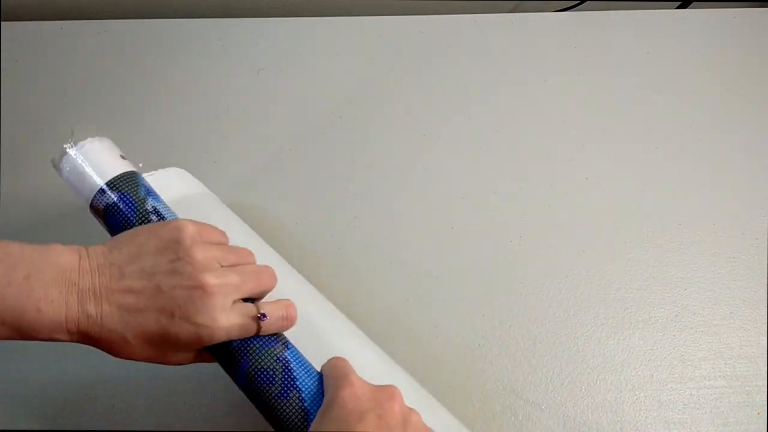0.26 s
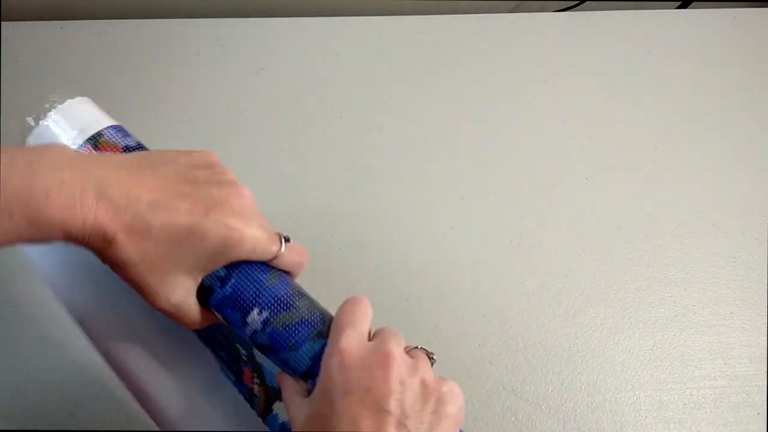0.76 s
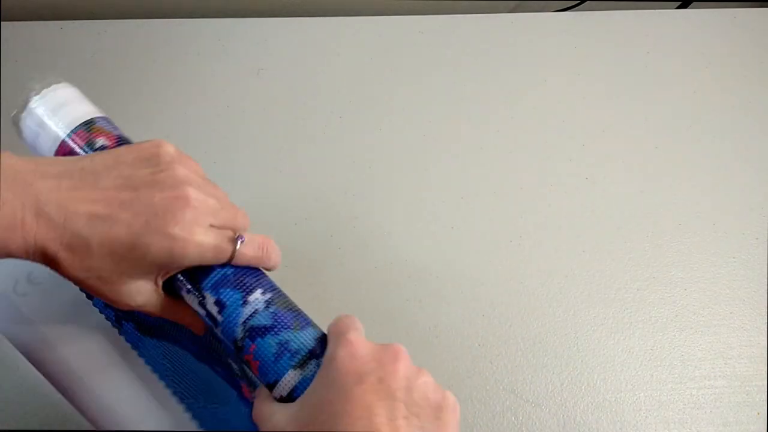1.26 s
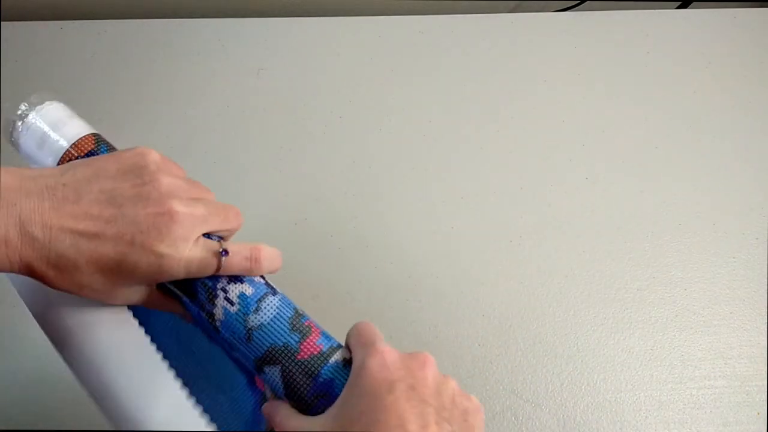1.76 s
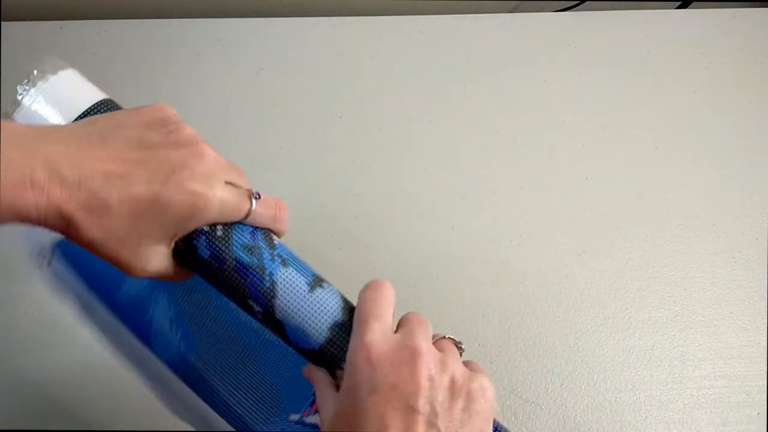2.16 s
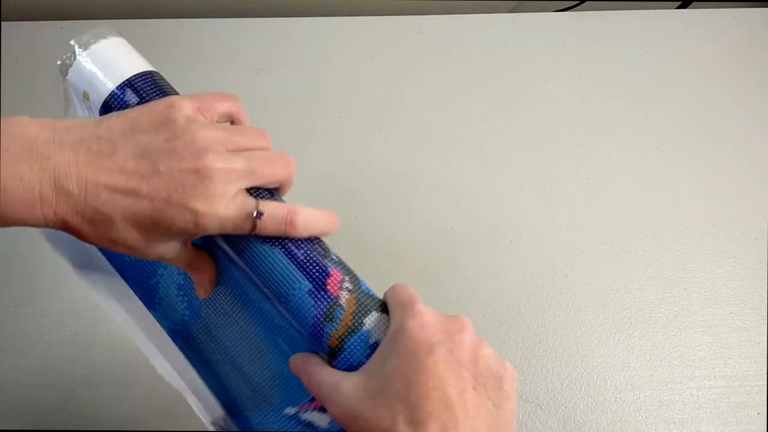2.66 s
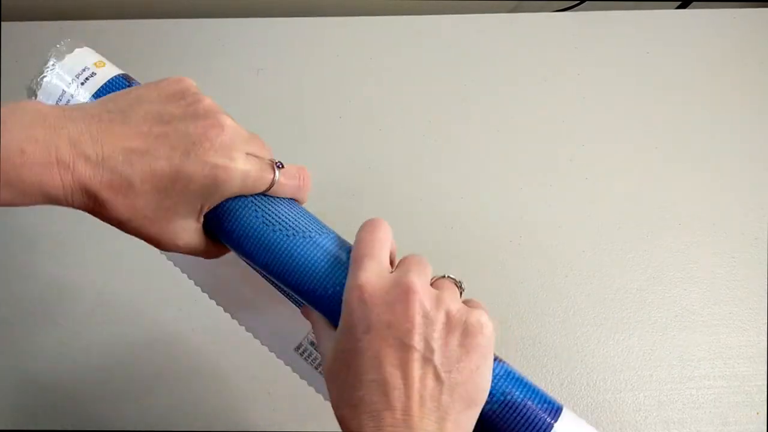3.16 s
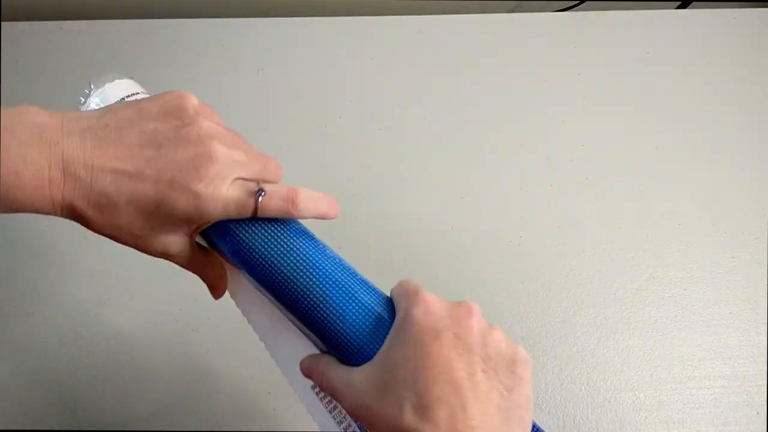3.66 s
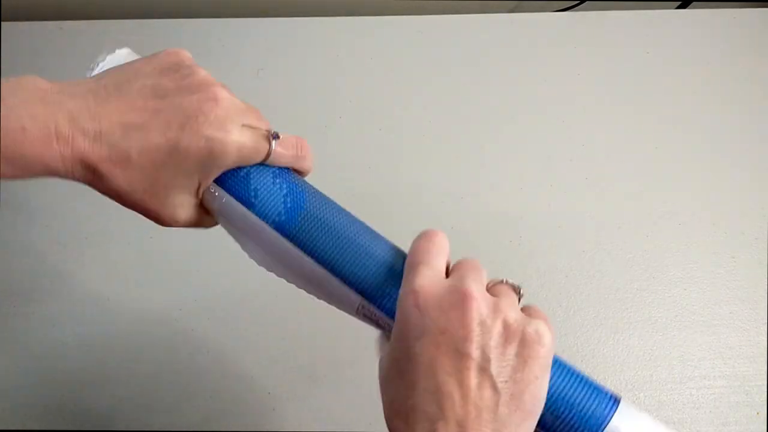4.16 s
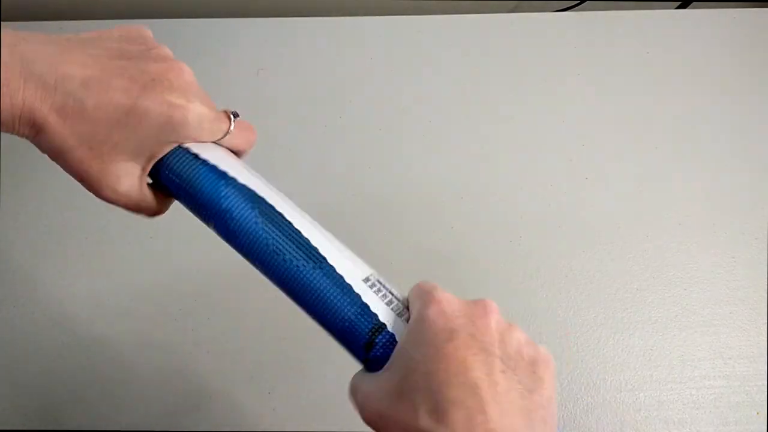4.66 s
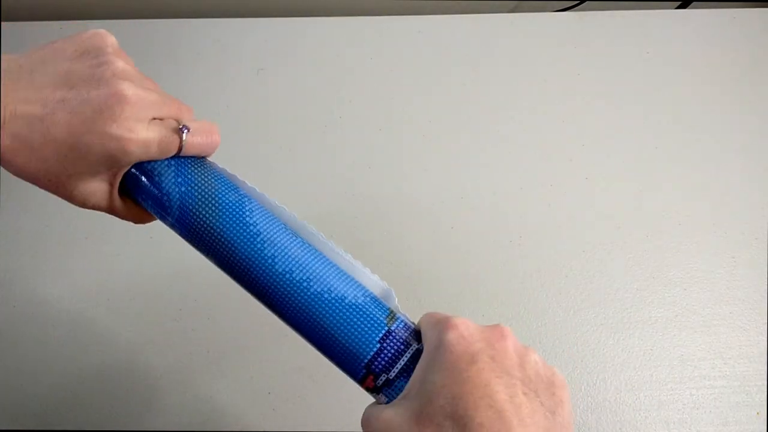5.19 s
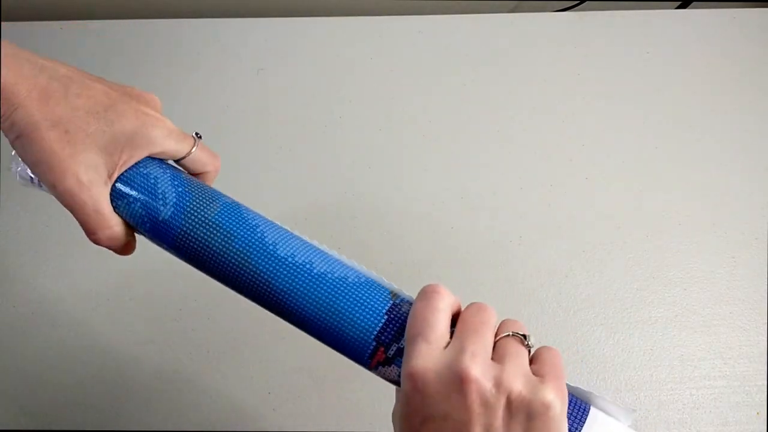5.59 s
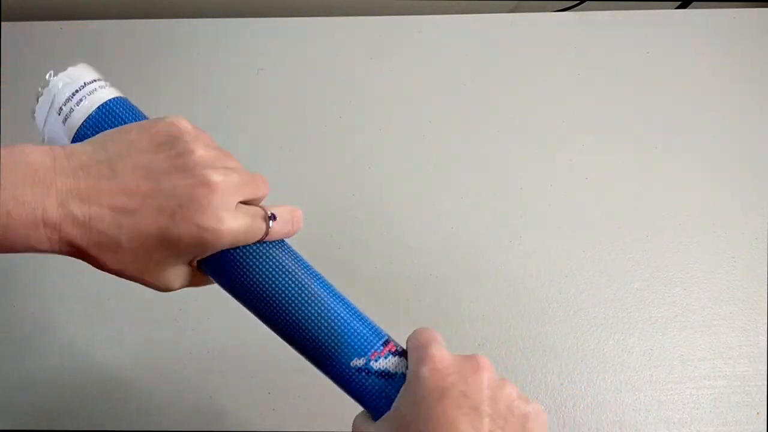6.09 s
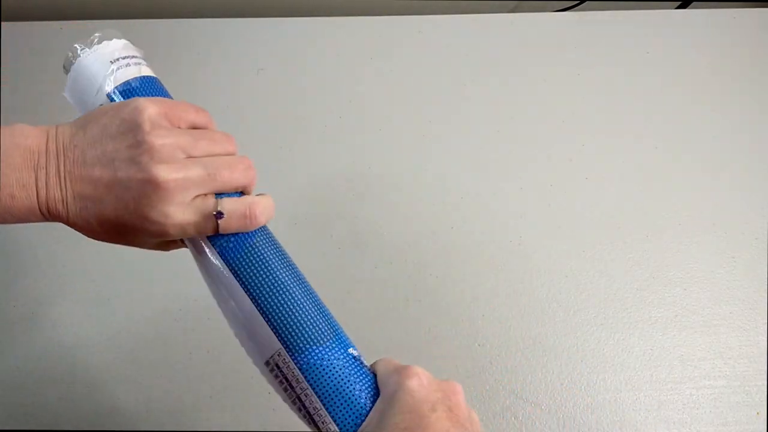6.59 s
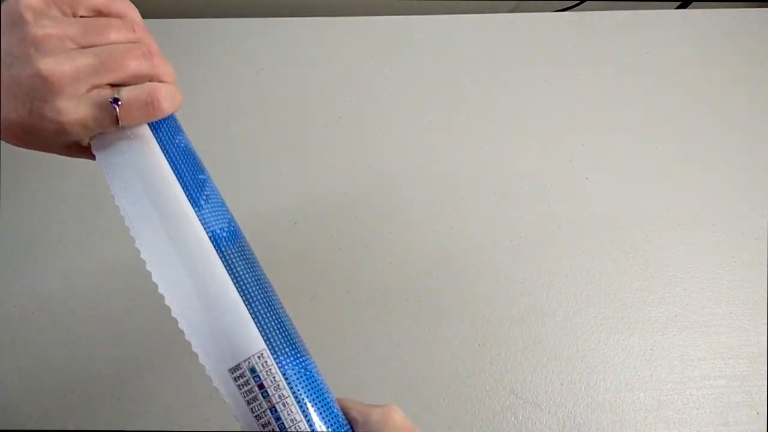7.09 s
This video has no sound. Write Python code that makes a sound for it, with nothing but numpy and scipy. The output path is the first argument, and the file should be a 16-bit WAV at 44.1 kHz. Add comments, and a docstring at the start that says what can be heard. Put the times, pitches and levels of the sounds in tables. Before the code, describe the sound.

A close small microphone picks up a stiff roll being turned and tightened by hand. Coarse cloth rubbing and hollow pops mix with plastic crackle at first; a burst of hard bright snaps follows in the middle, then thinner film rustling with pauses and a few last sharp clicks. Soft low bumps of the table, short small-room reflections and quiet low room tone lie beneath.

```python
"""Bright crinkling, sharp snaps and dull pops, push by push: hands roll stiff film-covered canvas into a tube.
Film is dense random grains, clicks and ringing ticks; cloth is duller grains, part of them ringing in the tube.
Snaps are banded noise bursts; pops are kicked panel modes that also excite the air column of the roll.
Below lie thuds and rumble of the table, small-room reflections and a steady low room tone.
A close small microphone adds two treble resonances and cuts the top."""
import sys
import numpy as np
from scipy import signal
from scipy.fft import rfft, irfft
from scipy.io import wavfile
from scipy.ndimage import uniform_filter1d

SR = 44100
rng = np.random.default_rng(int(sys.argv[2]) if len(sys.argv) > 2 else 0)


def unload_wav(signal):
    """Save mono or channel-first audio to the path in sys.argv[1] as 16-bit WAV at rate SR, clipped to [-1, 1]."""
    wavfile.write(
        sys.argv[1],
        SR,
        np.round(np.clip(np.atleast_2d(signal).T, -1, 1) * 32767).astype(np.int16),
    )


N = 323694
MIC_LIFT_DB = 7.5  # added to the treble by the mic; taken off at the source


def from_db(db):
    """dB to amplitude gain."""
    return 10 ** (np.asarray(db) / 20)


def rms_one(x):
    """Scale to rms 1."""
    return x / np.sqrt(np.mean(x ** 2) + 1e-20)


def drift(rate_hz):
    """Slow random curve, rms 1: noise twice through a one-pole low-pass."""
    r = np.exp(-2 * np.pi * rate_hz / SR)
    noise = rng.standard_normal(N + SR)
    return rms_one(signal.lfilter([1], [1, -2 * r, r * r], noise)[SR:])


def colour(x, spectrum, size=4096):
    """Minimum-phase filter with the given spectrum, via the folded cepstrum."""
    hz, level_db = np.transpose(spectrum)
    bins_hz = np.fft.rfftfreq(size, 1 / SR)
    gain_db = np.interp(np.log(bins_hz + 1), np.log(hz), level_db)
    cepstrum = irfft(np.log(from_db(gain_db)))
    cepstrum[1:size // 2] *= 2
    cepstrum[size // 2 + 1:] = 0
    impulse = irfft(np.exp(rfft(cepstrum)))
    return signal.fftconvolve(x, impulse)[:N]


def ring(clicks, hz, t60_s):
    """Two-pole resonator: a unit click starts a decaying sine of height 1; t60 at least 3 ms."""
    r = from_db(-60 / (max(t60_s, 0.003) * SR))
    w = 2 * np.pi * hz / SR
    return signal.lfilter([0, np.sin(w)], [1, -2 * r * np.cos(w), r * r], clicks + 1e-18)


def grains(per_s, spread_db):
    """Tiny creases flip at random, either sign, a few much larger than the rest; rms 1."""
    sizes = from_db(spread_db * np.minimum(rng.exponential(1, N), 5)) * rng.choice([-1, 1], N)
    born = rng.random(N) < per_s / SR
    return rms_one(sizes * born)


# Finger pushes on the roll: [full force t/s, held/s, film level/dB, cloth level/dB re film]
PUSHES = [(0, 0, -39, 2.5), (0.109, 0.069, -42, 2), (0.282, 0.037, -44, 4), (0.349, 0.039, -47.5, 8),
          (0.471, 0.11, -47, 6.5), (0.652, 0.031, -47.5, 5.5), (0.74, 0.025, -47.5, 0.5),
          (0.819, 0.076, -46.5, 3.5), (0.94, 0.026, -45.5, 2.5), (1.042, 0.095, -41, -1),
          (1.24, 0.094, -53, 0.5), (1.35, 0.21, -60.5, 5), (1.542, 0.044, -49, 4.5),
          (1.64, 0.048, -47, -4.5), (1.77, 0.0048, -47.5, -6), (1.84, 0.08, -49, -5.5),
          (1.921, 0.018, -46.5, 3.5), (2.02, 0.092, -48, -3), (2.19, 0.03, -46.5, -0.5),
          (2.26, 0.0095, -51.5, 9), (2.36, 0.15, -48.5, -2), (2.49, 0.072, -44, -2.5),
          (2.59, 0.048, -37, -10.5), (2.692, 0, -38.5, 0.5), (2.782, 0.099, -37.5, -4.5),
          (3.05, 0.018, -50, -3), (3.162, 0.022, -39, -6.5), (3.24, 0.038, -47, -4.5),
          (3.4, 0.032, -43.5, -6), (3.51, 0.0092, -42.5, -14), (3.58, 0.076, -55, 1.5),
          (3.769, 0.085, -50, -6), (3.91, 0.036, -51, -1.5), (3.97, 0.046, -51, -11),
          (4.12, 0.012, -37, -15.5), (4.289, 0.018, -44, -5.5), (4.451, 0.024, -45, -12),
          (4.612, 0.033, -43, -8.5), (4.792, 0.063, -44, -10), (4.93, 0.078, -45.5, -10),
          (5.06, 0.019, -49, -14.5), (5.222, 0.04, -43, -6.5), (5.32, 0.029, -48, -11),
          (5.518, 0.046, -44, -10), (5.65, 0.088, -54.5, -11), (5.8, 0.08, -49, -8),
          (5.92, 0.0067, -48.5, -9), (6.05, 0.0, -50, -26), (6.08, 0.034, -50, -9.5),
          (6.21, 0.049, -55.5, -5.5), (6.32, 0.046, -55, -5.5), (6.39, 0.036, -66.5, 1.5),
          (6.59, 0.1, -49, -13), (6.8, 0.073, -52.5, -15), (6.98, 0, -42, -16), (7.198, 0.039, -46.5, -20)]


def pushes():
    """Film and cloth gains: pushes swell fast, hold, fade more slowly; overlapping powers add."""
    swell_db_per_s, fade_db_per_s = 409, 192
    t = np.arange(0, N + 64, 64) / SR
    power = 0
    for s, held_s, film_db, cloth_db in PUSHES:
        swell_db = -swell_db_per_s * np.maximum(s - t, 0)
        fade_db = -fade_db_per_s * np.maximum(t - s - held_s, 0)
        level_db = film_db + np.array([[0], [cloth_db]]) + swell_db + fade_db
        power = power + from_db(level_db) ** 2
    return [np.interp(np.arange(N) / SR, t, np.sqrt(p)) for p in power]


def slips(per_s, spread_db, t60_s):
    """Stick-slip loudness: uneven slips die away over steady creep; local rms held near 1."""
    sizes = from_db(spread_db * np.minimum(rng.exponential(1, N), 4))
    born = rng.random(N) < per_s / SR
    decay = from_db(-60 / (t60_s * SR))
    fading = 0.5 + rms_one(signal.lfilter([1], [1, -decay], sizes * born))
    return fading / np.sqrt(uniform_filter1d(fading ** 2, size=4000))


def ticks(per_s, spread_db, cycles, count=20):
    """Small facets pop, each ringing briefly at one of 20 pitches, dealt at random."""
    flips = grains(per_s, spread_db)
    dealt = rng.integers(0, count, N)
    out = 0
    for k, hz in enumerate(np.geomspace(900, 15000, count)):
        out = out + ring(flips * (dealt == k), hz, cycles / hz) * np.sqrt(hz)
    return out


# Film spectrum at the source: [f/Hz, level/dB per Hz]
FILM_SPECTRUM = [(300, -54), (1000, -17.5), (2000, 2.5), (3000, -1.5), (4500, -3.5), (7000, -5),
                 (11000, -9.5), (16500, -8)]


def film(gain, slip):
    """Plastic crinkle: slip-driven dense grains, coloured ticks and lone sharp clicks."""
    dense = rms_one(slip * grains(12000, 1.1))
    coloured = rms_one(ticks(460, 0.82, 19.0))
    lone = rms_one(np.diff(grains(300, 4.0), prepend=0))
    bed = dense + 0.25 * coloured + 0.55 * lone
    return gain * from_db(-MIC_LIFT_DB) * rms_one(colour(bed, FILM_SPECTRUM))


# Air-column modes of the roll: [f/Hz, level/dB, t60/s]
TUBE_MODES = [(344.4, -6, 0.2), (424, 0.5, 0.055), (687, -26, 0.011), (812.4, 1, 0.066), (1294, 1, 0.023),
              (1390, -6, 0.12), (1636, -11, 0.051), (2000, 4.5, 0.029)]


def tube(x):
    """Air column of the roll: parallel modes of alternating sign."""
    out = 0
    for k, (hz, db, t60_s) in enumerate(TUBE_MODES):
        out = out + (-1) ** k * from_db(db) * ring(x, hz, t60_s)
    return out


# Cloth spectrum at the source: [f/Hz, level/dB per Hz]
CLOTH_SPECTRUM = [(100, -18.5), (270, -9.5), (340, -8.5), (700, 3.5), (1000, 2), (2000, 2.5), (2900, -0.5),
                  (4000, -10), (8000, -21.5)]


def cloth(gain, slip):
    """Fibres and coating rub and crease; part of it rings in the tube."""
    rub = slip ** 0.38 * grains(4000, 2.65) * from_db(2.76 * drift(27.0))
    direct = rms_one(colour(rub, CLOTH_SPECTRUM))
    return gain * rms_one(direct + 0.28 * rms_one(tube(rub)))


# Film creases snapping over: [t/s, nominal peak level/dB, low-band level/dB re peak]
SNAPS = [(0.0575, -31, 5), (0.1626, -20.5, -13), (0.388, -26, -18), (0.4687, -23.5, 7.5), (0.73, -25, 8),
         (0.736, -19.5, -36), (0.8196, -20, -6), (0.8705, -23.5, 7), (0.9183, -31, -15), (0.9533, -23, -34),
         (0.996, -21, -19), (1.0429, -40, 19), (1.1095, -33.5, 12.5), (1.2514, -24, -16),
         (1.3653, -25.5, -27), (1.5407, -24, 0.5), (1.7762, -30, 7.5), (1.843, -29, -19),
         (1.8774, -22.5, -6), (1.931, -24, -26), (2.012, -19, -39), (2.0418, -19, -35), (2.127, -31, -12),
         (2.176, -17, -16), (2.211, -22.5, -10), (2.353, -27, -28), (2.378, -23, -8), (2.3986, -29, -6),
         (2.4566, -28, -12), (2.4842, -26, 0), (2.51, -18, -25), (2.543, -19, -7), (2.575, -21, -2),
         (2.606, -21, 2), (2.6753, -29, -15), (2.6943, -13, -27), (2.7008, -15, -7), (2.7764, -22.5, -14),
         (2.7916, -20, -30), (2.818, -37, -27), (2.8602, -15.5, -20), (2.895, -18, -4), (2.9625, -25, -21),
         (3.06, -25.5, 3), (3.1414, -20.5, -34), (3.1758, -21.5, -34), (3.24, -29.5, 5), (3.253, -26, 2),
         (3.2938, -28.5, 3), (3.317, -27, -16), (3.391, -22.5, -38), (3.431, -21.5, -35),
         (3.5042, -22, -46), (3.5884, -26, -18), (3.7485, -34.5, 2), (3.793, -27.5, -0.5),
         (4.0984, -37, -27), (4.124, -16.5, -34), (4.1804, -18, -2), (4.4434, -30, -13), (4.586, -43, 0),
         (4.6314, -33, -20), (4.781, -30, -24), (4.9135, -25, -9), (5.065, -24.5, -9), (5.1808, -29.5, -13),
         (5.2195, -38, -11), (5.243, -23.5, -14), (5.3233, -33.5, 3), (5.405, -34, -28), (5.5024, -41, -23),
         (5.8383, -32, -3), (5.9244, -37, -18), (5.9688, -25, -44), (6.0294, -25.5, -5.5),
         (6.0621, -29, -26), (6.19, -37, -12), (6.4086, -31.5, 0.5), (6.574, -32, -3.5), (6.5915, -37, -29),
         (6.64, -18, -46), (6.9872, -20, -42), (7.1675, -31.5, -11), (7.196, -30, -29), (7.2025, -19, -20),
         (7.221, -26, -30), (7.228, -26, -28)]


def snaps(size=4410):
    """A crease snaps over: sharp crack, then dying micro-cracks, in three noise bands."""
    t60_s, rise_s, crack_tau_s = 0.068, 0.00078, 0.00023
    top_db, crest_db = -1, 12  # top band re peak; burst peak over its rms
    t = np.arange(size) / SR
    shape = from_db(-60 * t / t60_s) * np.minimum(t / rise_s, 1) + 2.3 * np.exp(-t / crack_tau_s)
    parts = np.zeros((3, N + size))
    for s, db, low_db in SNAPS:
        crack = rng.standard_normal(size) * from_db(4.0 * rng.standard_normal(size))
        band_db = db + np.array([[low_db + MIC_LIFT_DB], [0], [top_db]])
        at = round(s * SR)
        parts[:, at:at + size] += from_db(band_db) * shape * crack
    edges_hz = [1300, 4000, 10500, 19000]
    out = 0
    for low_hz, high_hz, part in zip(edges_hz, edges_hz[1:], parts):
        band = signal.butter(2, [low_hz, high_hz], "band", fs=SR, output="sos")
        out = out + signal.sosfilt(band, part[:N])
    return from_db(-MIC_LIFT_DB - crest_db) * out


# Cloth panels buckling: [t/s, nominal peak level/dB, panel f/Hz, t60/s]
POPS = [(0.097, -34.5, 1480, 0.075), (0.272, -35.5, 1330, 0.034), (0.467, -30.5, 2650, 0.024),
        (0.582, -18.5, 1070, 0.018), (0.73, -32, 920, 0.043), (0.772, -30, 850, 0.038),
        (0.877, -23.5, 867, 0.027), (0.959, -30, 1220, 0.0059), (0.999, -23.5, 1450, 0.045),
        (1.039, -34, 830, 0.029), (1.246, -40.5, 655, 0.012), (1.363, -22.5, 940, 0.012),
        (1.772, -30.5, 1380, 0.011), (1.892, -37, 740, 0.019), (1.922, -49, 1130, 0.016),
        (2.083, -43.5, 865, 0.043), (2.104, -34.5, 1090, 0.016), (2.176, -35.5, 1210, 0.012),
        (2.428, -27, 840, 0.013), (2.511, -29.5, 2270, 0.021), (2.594, -26, 820, 0.0067),
        (2.647, -33, 2520, 0.032), (2.753, -20, 855, 0.015), (2.817, -47, 1240, 0.026),
        (2.861, -23, 1470, 0.0043), (3.152, -36, 1390, 0.018), (3.201, -25, 350, 0.0054),
        (3.39, -33, 1560, 0.02), (3.502, -37.5, 2020, 0.017), (3.56, -35, 1500, 0.013),
        (3.593, -34, 1960, 0.019), (3.658, -25, 340, 0.0051), (3.914, -58, 860, 0.025),
        (4.132, -34.5, 2034, 0.06), (4.177, -38.5, 2164, 0.09), (4.19, -37, 1760, 0.063),
        (4.32, -34, 1900, 0.014), (4.444, -43, 2040, 0.007), (4.675, -47, 900, 0.015),
        (4.815, -37, 2220, 0.012), (4.855, -41, 2800, 0.011), (4.964, -42, 830, 0.025),
        (5.201, -50, 1220, 0.053), (5.318, -35.5, 2070, 0.028), (5.525, -50, 2500, 0.035),
        (5.931, -38.5, 2500, 0.022), (5.969, -44, 2300, 0.025), (6.029, -39.5, 2250, 0.057),
        (6.064, -46.5, 2260, 0.036), (6.304, -48.5, 2540, 0.018), (6.406, -47, 1660, 0.011),
        (6.588, -49, 870, 0.061), (6.642, -36.5, 1574, 0.034), (6.7, -45, 1320, 0.03)]
# Panel modes: [multiple of panel f, level/dB]
PANEL_MODES = [(1.001, 0.5), (1.62, -8.5), (2.3, -20)]


def pops(size=6000):
    """A cloth panel flips with a stutter: rings at its modes, knocks and sets off the tube."""
    knock_db, knock_loss_db_per_s = 0.5, 215  # longer-ringing panels knock less
    t = np.arange(size) / SR
    panel, kicks = np.zeros(N + size), np.zeros(N + size)
    for s, db, hz, t60_s in POPS:
        kick = 0.07 * rng.standard_normal(size) * np.exp(-t / 0.004)  # stutter
        kick[40] = 1  # main flip
        at = round(s * SR)
        for times, mode_db in PANEL_MODES:
            panel[at:at + size] += from_db(db + mode_db) * ring(kick, hz * times, t60_s / times)
        kicks[at:at + size] += from_db(db + knock_db - knock_loss_db_per_s * t60_s) * kick
    panel, kicks = panel[:N], kicks[:N]
    soft = signal.lfilter([0.3], [1, -0.7], kicks)
    knocks = 0.24 * ring(soft, 840, 0.011) + 0.39 * ring(kicks, 2350, 0.0073)
    mix = panel + knocks + from_db(-14) * tube(soft)
    # a small panel pushes no deep bass into the air
    return 0.75 * signal.sosfilt(signal.butter(1, 220, "high", fs=SR, output="sos"), mix)


# Roll bumping table or hand: [t/s, level/dB, f/Hz]
BUMPS = [(0.444, -36.5, 78.5), (0.581, -37.5, 173), (1.231, -48, 172), (1.363, -49, 91.5),
         (1.592, -48, 61.9), (2.196, -31.5, 61.4), (2.427, -38, 221), (2.749, -53, 221), (3.196, -57, 212),
         (4.097, -52, 180), (4.443, -50, 213), (5.219, -49, 150)]


def bumps(size=6000):
    """Roll bumps table or hand: short low thuds, each one decaying sine."""
    t60_s = 0.019
    out, click = np.zeros(N + size), np.eye(1, size)[0]
    for s, db, hz in BUMPS:
        at = round(s * SR)
        out[at:at + size] += from_db(db) * ring(click, hz, t60_s)
    return out[:N]


def rumble(gain):
    """Hands and roll shake the table top: drifting 45-180 Hz noise."""
    low = signal.butter(2, [45, 180], "band", fs=SR, output="sos")
    shake = rng.standard_normal(N) * from_db(2.0 * drift(2.5))
    return gain * rms_one(signal.sosfilt(low, shake))


def room(x, count=8):
    """Diffuse reflections: dying noise tails, crossfaded in turn as the moving roll changes the paths."""
    t60_s, gap_s, wall_cut_hz, step_s = 0.34, 0.004, 15000, 0.12
    t = np.arange(SR // 2) / SR
    tails = rng.standard_normal((count, len(t))) * from_db(-60 * t / t60_s) * (t > gap_s)
    tails = signal.sosfilt(signal.butter(1, wall_cut_hz, fs=SR, output="sos"), tails)
    place = np.arange(N) / SR / step_s % count
    out = 0
    for k, tail in enumerate(tails):
        apart = np.abs((place - k + count / 2) % count - count / 2)
        share = np.cos(np.pi / 2 * np.minimum(apart, 1))  # equal power
        unit_tail = tail / np.sqrt(np.sum(tail ** 2))
        out = out + signal.fftconvolve(share * x, unit_tail)[:N]
    return out


# Background spectrum: [f/Hz, relative level/dB per Hz]
ROOM_TONE_SPECTRUM = [(12, -47), (20, 9.5), (34, 5), (55, -2), (97, -22.5), (202, -24), (332, -5),
                      (608, -27.5), (841, -15.5), (957, -31), (1210, -15), (1950, -44), (2270, -18.5),
                      (3500, -40), (4550, -59), (7700, -120)]


def room_tone(level_db=-66):
    """Steady low background: coloured noise."""
    return from_db(level_db) * rms_one(colour(rng.standard_normal(N), ROOM_TONE_SPECTRUM))


def scene():
    """Roll, its reflections, table and background."""
    crinkle, rustle = pushes()
    slip = slips(70, 0.57, 0.068) ** 0.8
    roll = film(crinkle, slip) + 0.88 * cloth(rustle, slip) + snaps() + pops()
    # harder handling shakes the table a little more
    table = bumps() + rumble(from_db(-53.5) * rustle ** 0.33)
    reflections = from_db(-11.5) * room(roll)
    return (roll + reflections + table + room_tone())[None]


# Microphone port resonances: [f/Hz, width/Hz, boost/dB]
MIC_PORT = [(7900, 950, 8.5), (16360, 2010, 19.5)]


def record(dry):
    """Port resonances lift the treble, then a steep low-pass cuts the top."""
    cutoff_hz = 15730
    out = dry
    for hz, width_hz, boost_db in MIC_PORT:
        b, a = signal.iirpeak(hz, hz / width_hz, fs=SR)
        out = out + (from_db(boost_db) - 1) * signal.lfilter(b, a, out)
    return signal.sosfilt(signal.ellip(14, 0.3, 70, cutoff_hz, fs=SR, output="sos"), out)


dry = scene()
out = record(dry)
unload_wav(out)
```